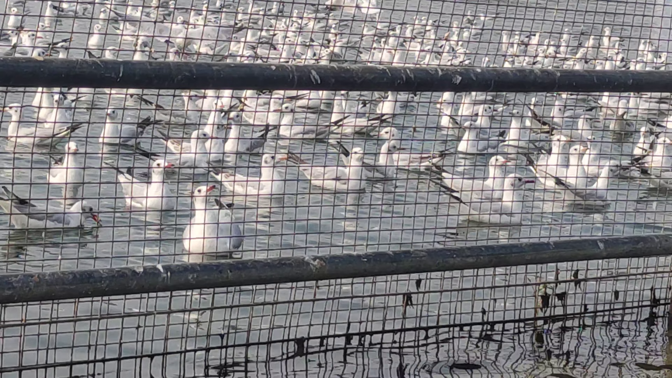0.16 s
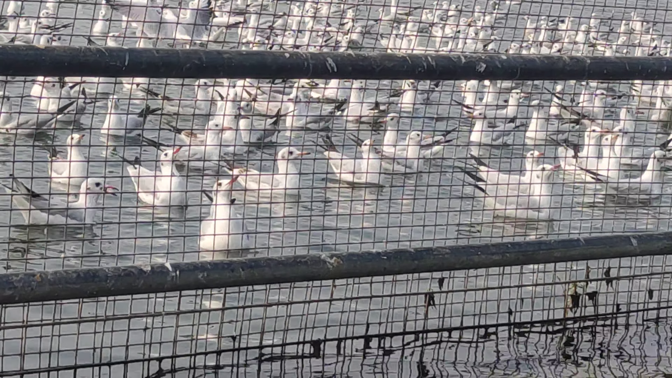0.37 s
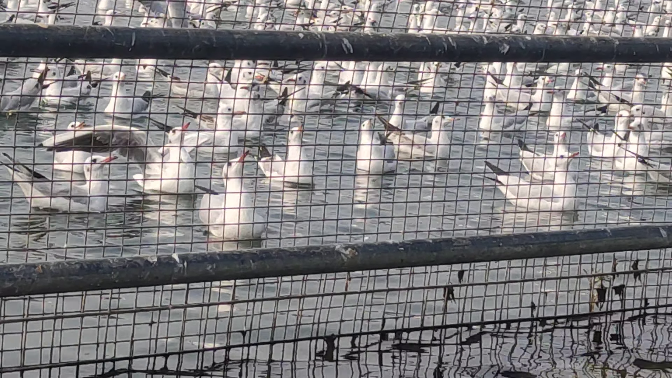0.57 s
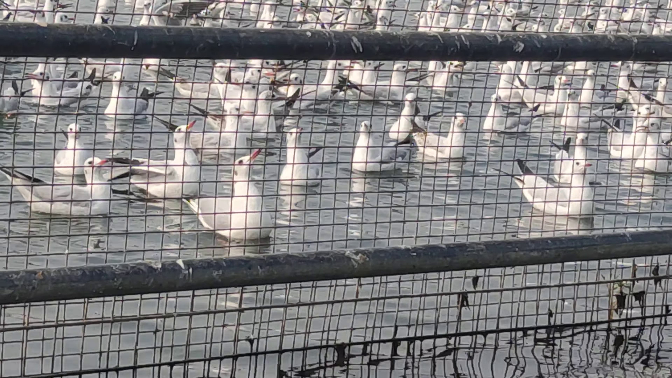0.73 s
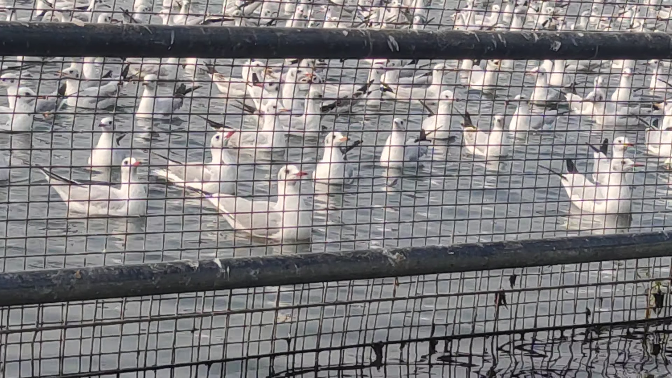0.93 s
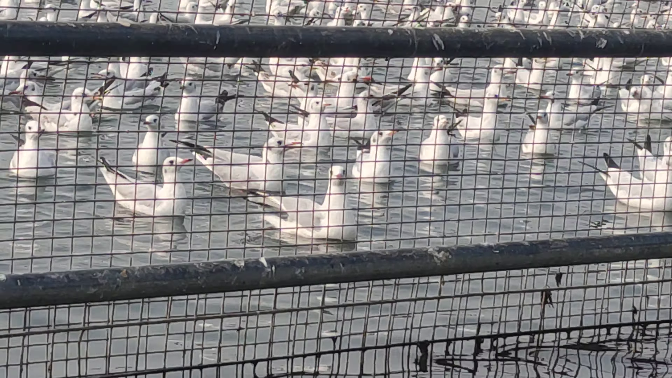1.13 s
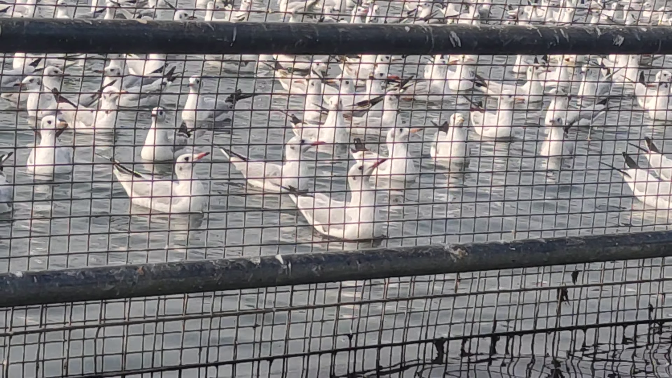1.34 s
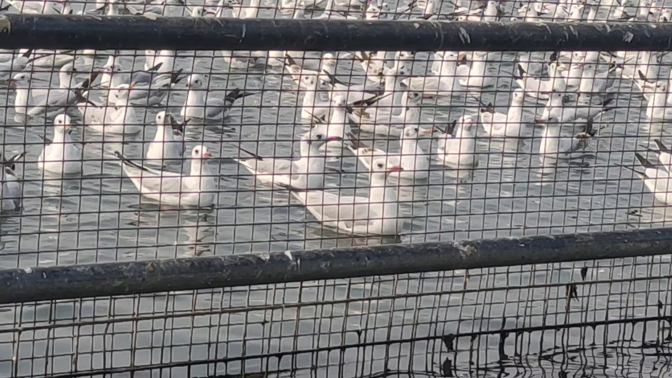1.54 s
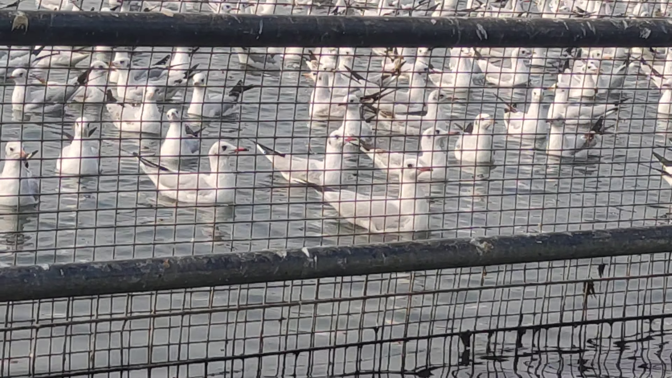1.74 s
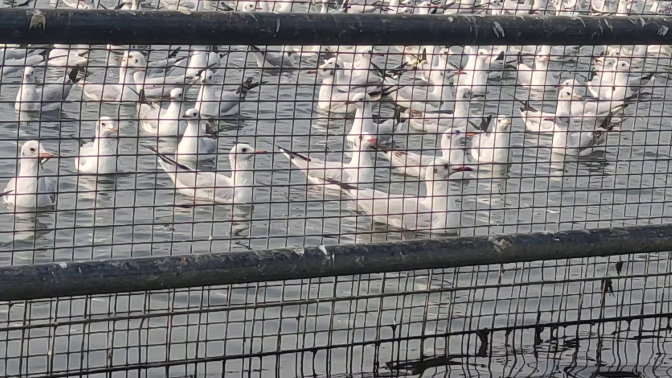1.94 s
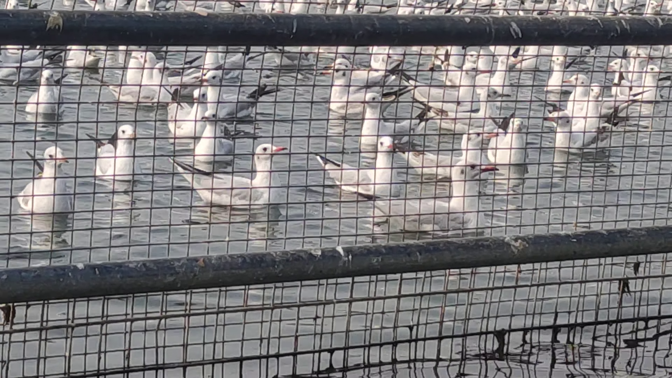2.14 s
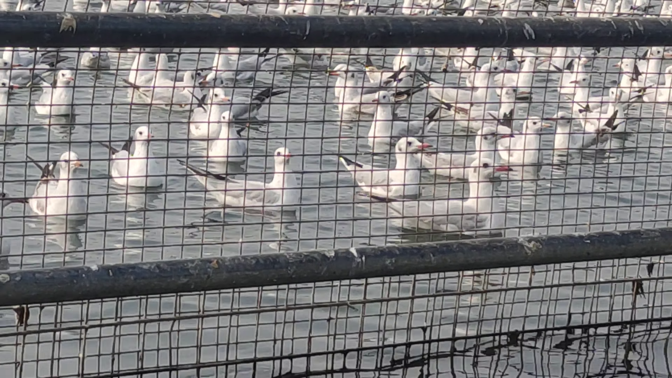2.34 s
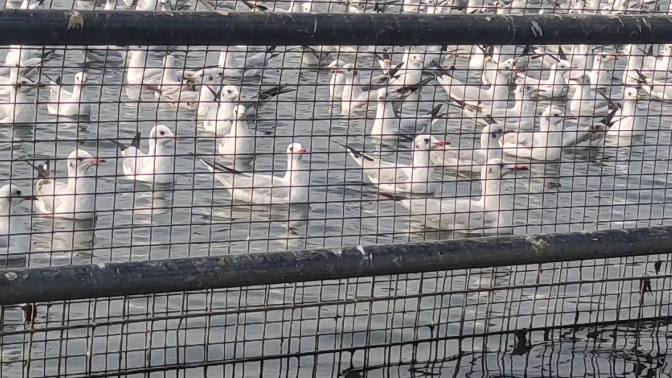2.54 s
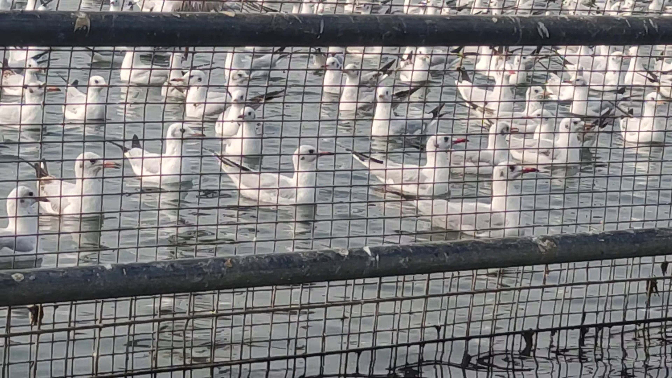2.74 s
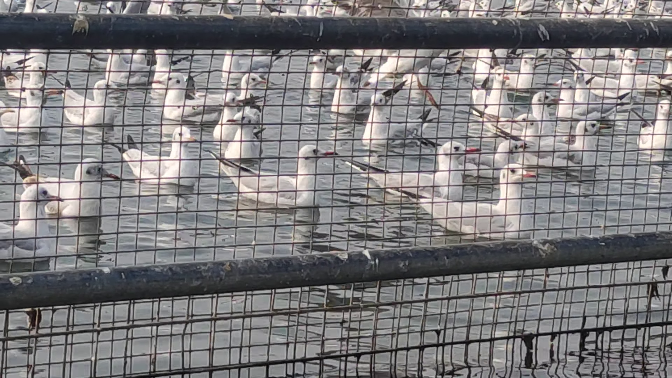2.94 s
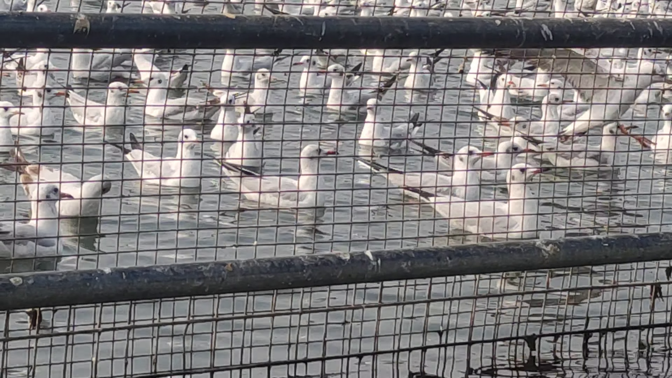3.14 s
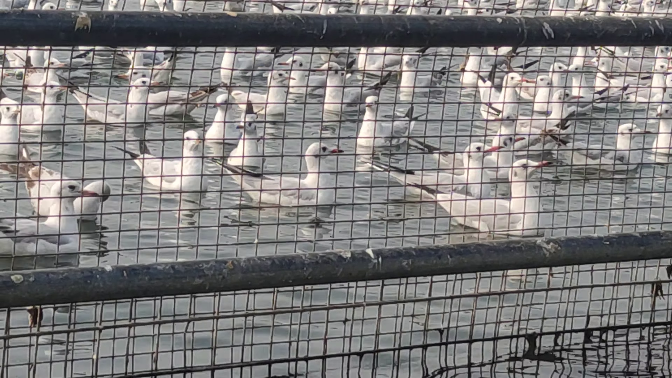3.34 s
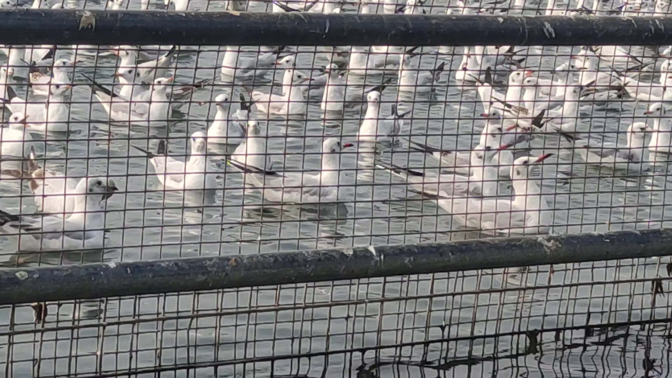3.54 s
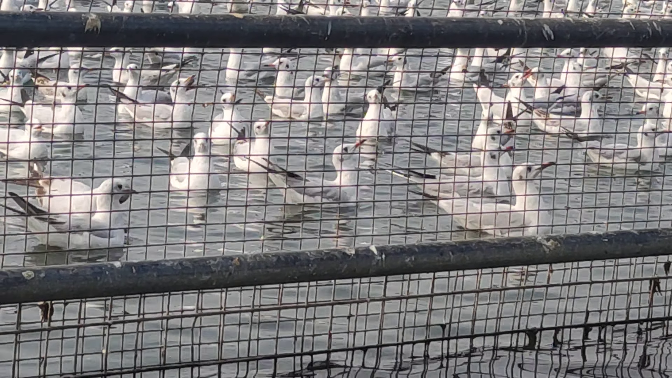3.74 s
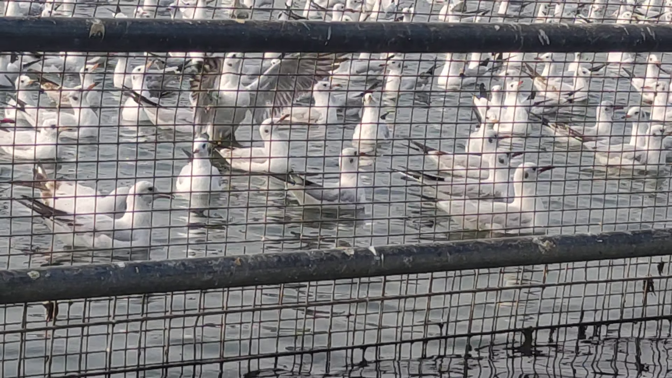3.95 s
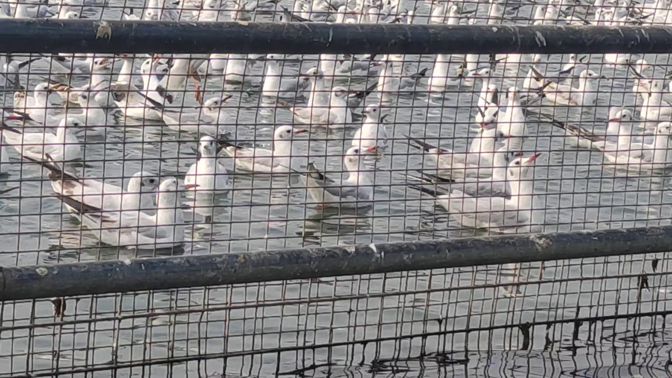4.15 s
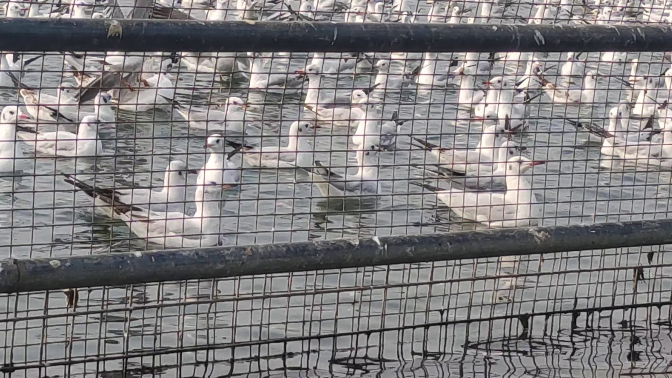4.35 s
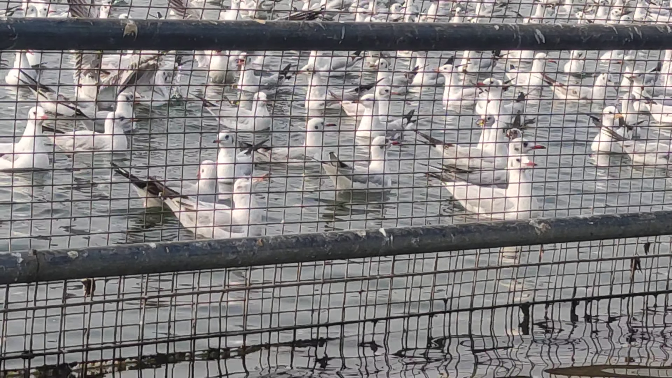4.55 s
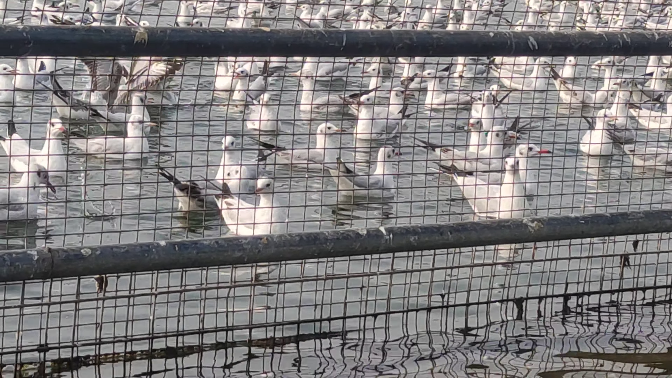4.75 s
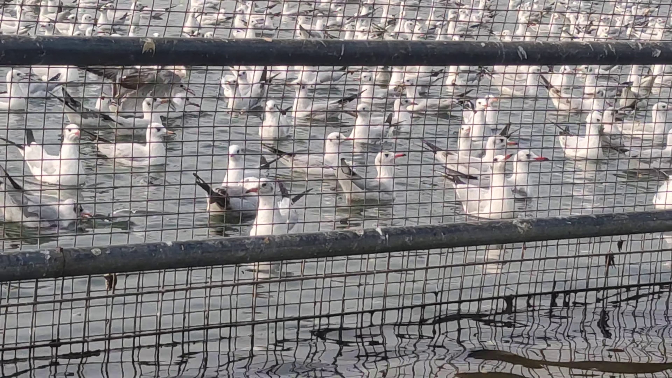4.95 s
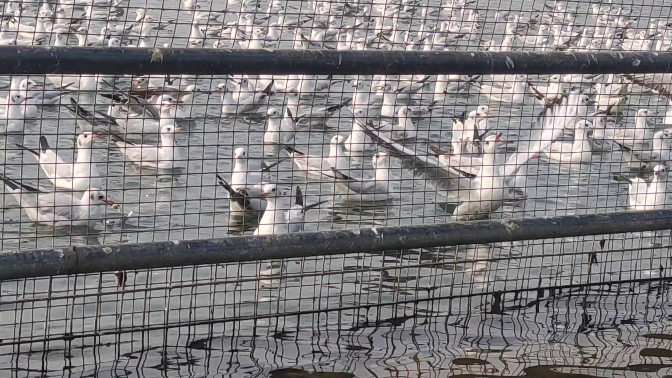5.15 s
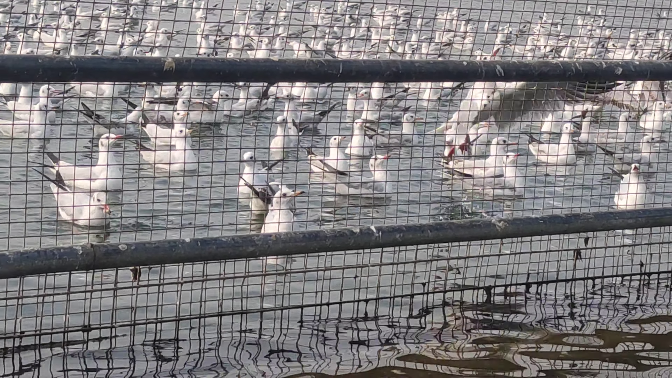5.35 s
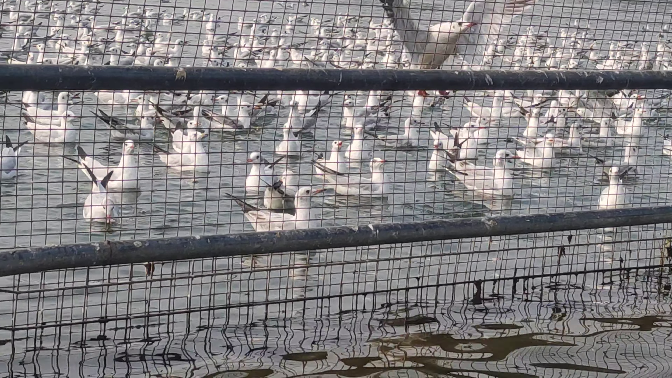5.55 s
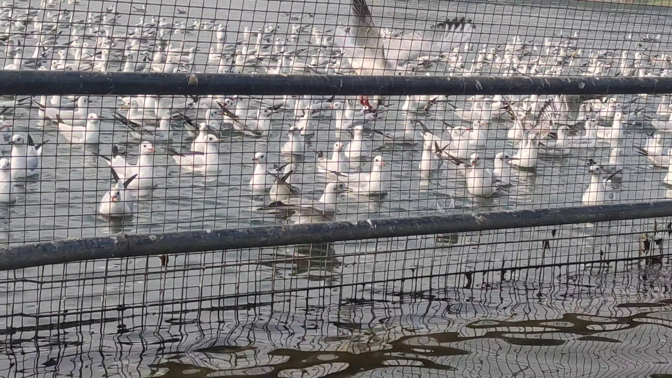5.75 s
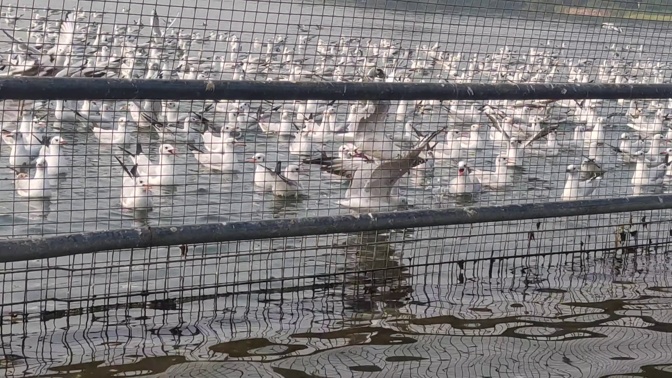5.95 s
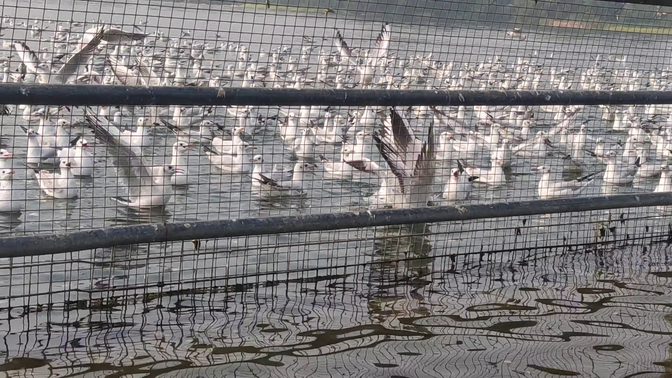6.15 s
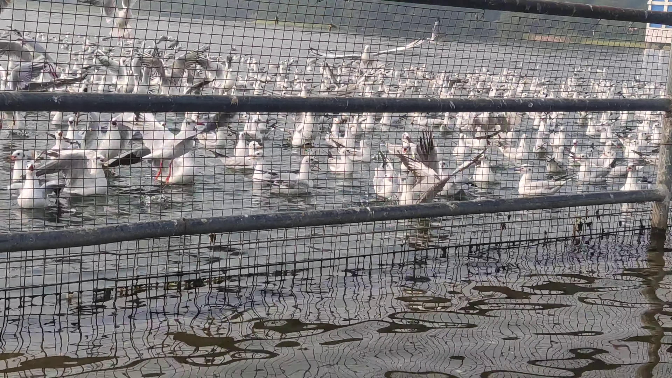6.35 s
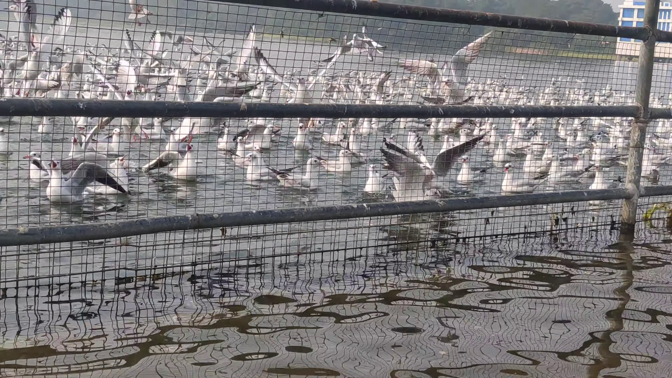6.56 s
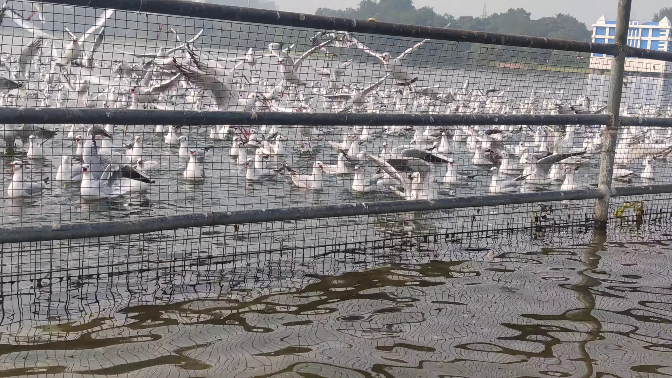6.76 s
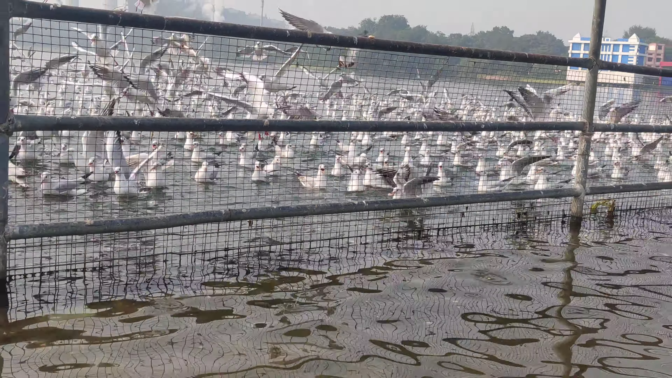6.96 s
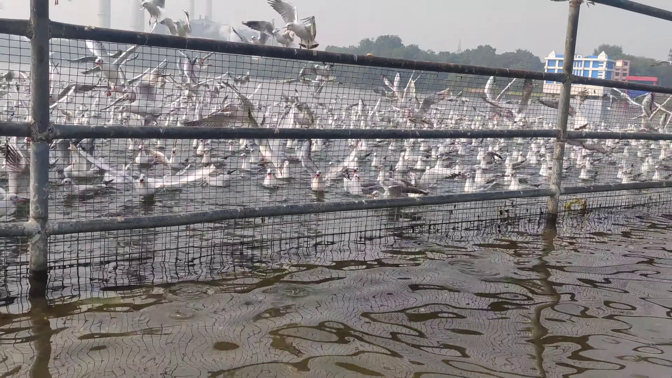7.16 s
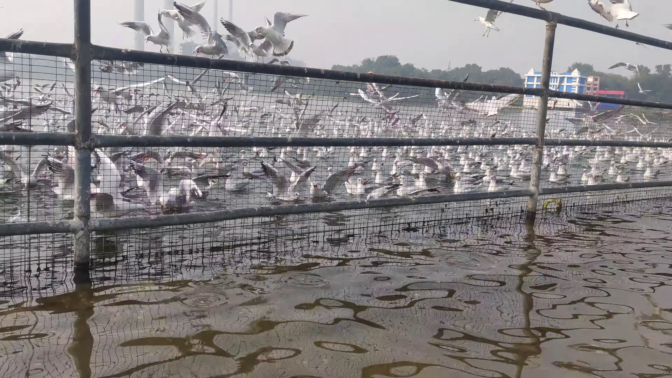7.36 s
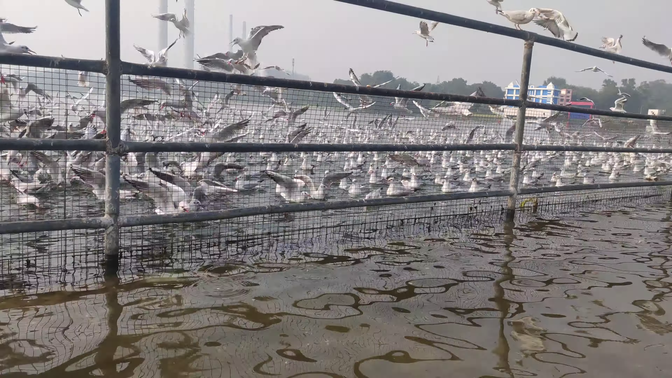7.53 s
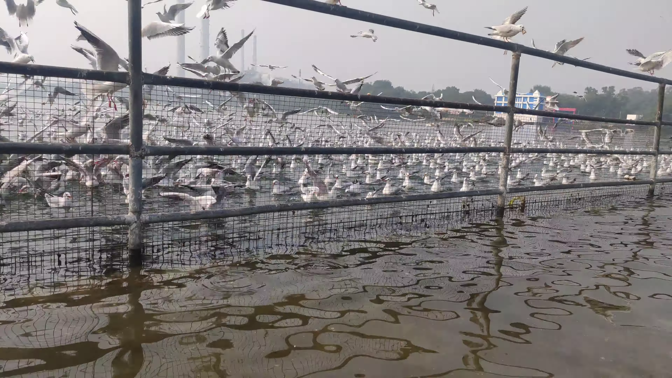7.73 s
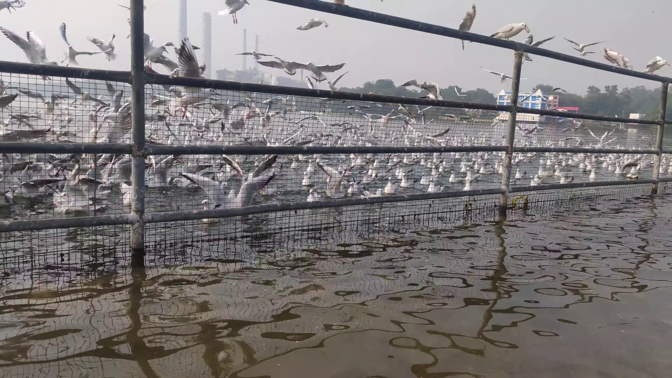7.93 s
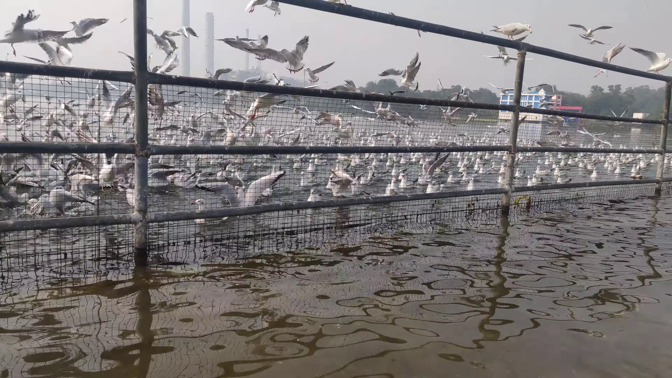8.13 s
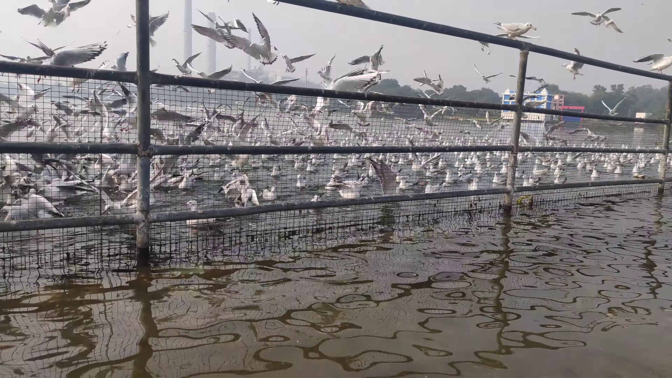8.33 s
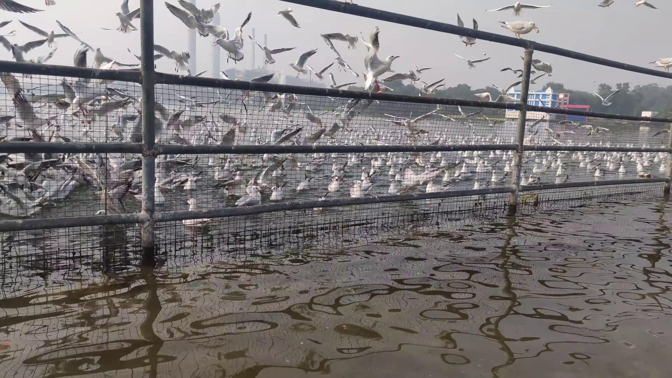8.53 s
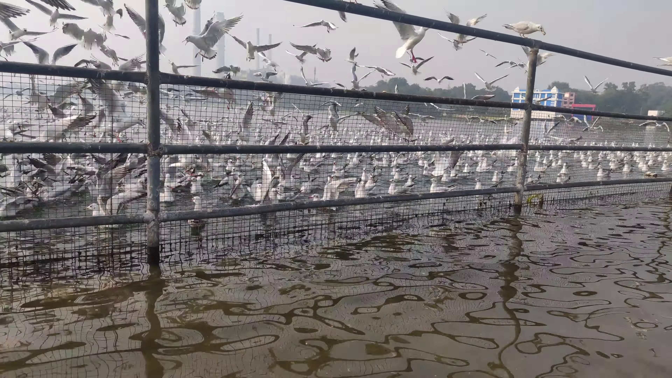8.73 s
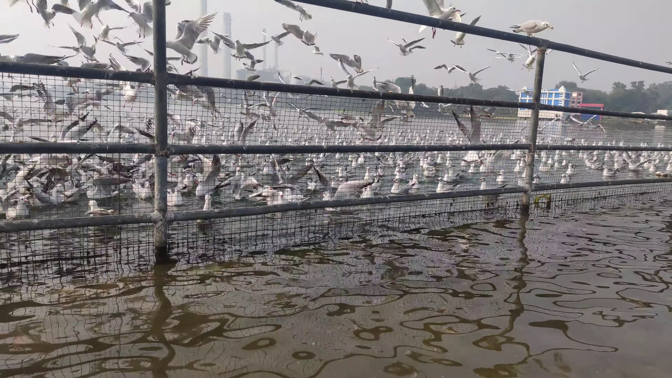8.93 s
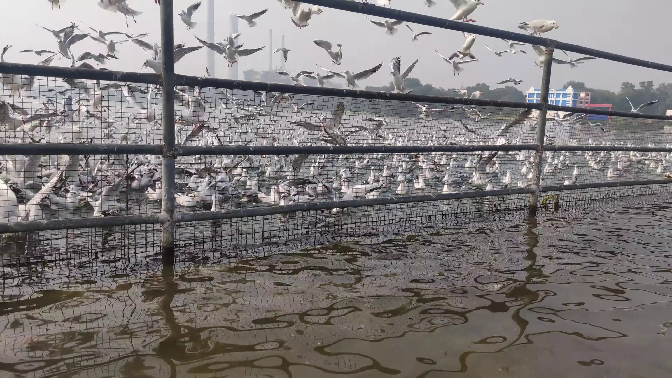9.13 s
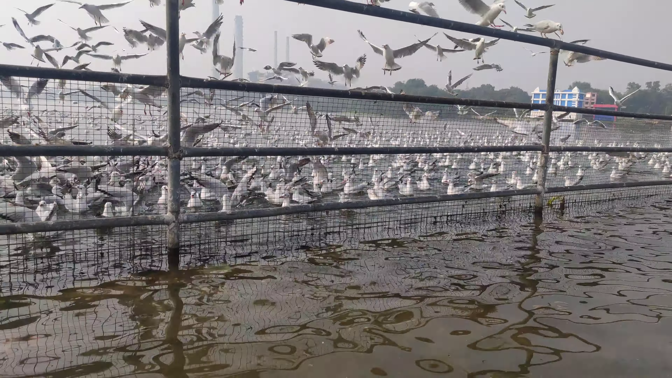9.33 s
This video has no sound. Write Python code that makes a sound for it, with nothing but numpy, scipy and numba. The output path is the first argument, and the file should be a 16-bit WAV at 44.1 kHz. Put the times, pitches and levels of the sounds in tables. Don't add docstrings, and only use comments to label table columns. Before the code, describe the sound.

Hundreds of gulls chatter raspily over a faint town hum, a few clear whistles poking out, before they rise in a dense shrieking wall with wing wash.

```python
import sys
import numpy as np
from scipy import signal
from scipy.fft import rfft, irfft, next_fast_len
from scipy.io import wavfile
from scipy.ndimage import uniform_filter1d
from numba import njit

SR = 44100
rng = np.random.default_rng(int(sys.argv[2]) if len(sys.argv) > 2 else 0)


def amplitude_ratio(level_db):
    exponent = np.asarray(level_db, float) / 20
    return 10 ** exponent


def pcm_store(signal):
    levels = np.round(np.clip(np.atleast_2d(signal), -1, 1) * 32767)
    wavfile.write(sys.argv[1], SR, levels.astype(np.int16).T)


N = 418509
T = np.arange(N) / SR
RATTLE_HZ = 95.9


def level(x, db):
    return x * amplitude_ratio(db) / np.sqrt(np.mean(x ** 2))


def colour(x, points, flatten_bins=0):
    hz, db = np.transpose(points)
    n = next_fast_len(N)
    spec = rfft(x, n)
    f = np.arange(n // 2 + 1) * SR / n + 1
    if flatten_bins:
        spec = spec / np.sqrt(uniform_filter1d(np.abs(spec) ** 2, flatten_bins) + 1e-9)
    gain_db = np.interp(np.log(f), np.log(hz), db, -120, -120)
    return irfft(spec * amplitude_ratio(gain_db), n)[:N]


def walk(rate_hz):
    k = int(SR / rate_hz)
    held = np.repeat(rng.standard_normal(N // k + 1), k)
    return 1.3 * uniform_filter1d(uniform_filter1d(held, k), k)[:N]


def risen_share():
    return np.clip((T - 6) / (6.9 - 6), 0, 1)


@njit
def cries(start, length, hz, arch, rough, gains, jitter, rasp, rattle_hz, depth, sweep):
    n = len(jitter)
    out = np.zeros(n)
    for c in range(len(start)):
        phase = 0.
        for i in range(length[c]):
            if 0 <= start[c] + i < n:
                u = i / length[c]
                j = (start[c] + i + 7919 * c) % n
                burst = 2 * np.pi * rattle_hz[c] * i / SR
                shake = rough[c] * jitter[j] - sweep * depth[c] * np.sin(burst)
                pitch_hz = hz[c] * (1 - arch[c] * (2 * u - .8) ** 2 + shake)
                phase += 2 * np.pi * pitch_hz / SR
                now = np.cos(phase)
                base, before, total = 2 * now, 1., 0.
                for g in gains[c]:
                    total += g * now
                    before, now = now, base * now - before
                size = (1 + 12 * rough[c] * rasp[j]) * (1 - depth[c] * np.cos(burst))
                out[start[c] + i] += total * min(1., 14 * u, 3 * (1 - u)) * size
    return out


def chorus(t0_s, t1_s, count, pitch_hz, spread, rough, size_db, voice_db, rattle):
    u = rng.random((count, 4))
    g = rng.standard_normal((count, 9))
    start_s = t0_s + (t1_s - t0_s) * (np.arange(count) + u[:, 0]) / count
    length_s = .06 + .16 * u[:, 1]
    bird_hz = pitch_hz * np.exp(spread * g[:, 1])
    hoarse = rough * amplitude_ratio(20 * u[:, 2] ** 0.696 - 16)
    gains = amplitude_ratio(size_db * g[:, :1] + voice_db * g[:, 2:])
    gains *= np.sign(rng.standard_normal((count, 7)))
    gains *= amplitude_ratio(3.8 * u[:, 2:3])
    bird_rattle_hz = RATTLE_HZ * (1.2 - 0.3596 * u[:, 1])
    depth = np.clip(rattle * u[:, 2], 0, 1)
    return cries((start_s * SR).astype(np.int64), (length_s * SR).astype(np.int64), bird_hz, .14 * u[:, 3],
                 hoarse, gains, walk(700), walk(400), bird_rattle_hz, depth, 0.029)


# time in seconds, level in dB, brightness in dB per step from throat to beak to rasp.
CROWD_LEVELS = [(0, -32.5, -5.5), (.55, -32.5, -9.5), (1.1, -35, -7.5), (1.5, -37, -9.5), (2.4, -32, -6.5),
                (3.5, -35, -6.5), (4.3, -33.5, -10.5), (4.75, -35, -7), (5.3, -36, -7.5), (5.98, -32, -6.5),
                (6.3, -23, -6), (6.9, -14.5, -3.5), (7.3, -16.5, -1.5), (7.8, -15.5, -2.5), (8.5, -16, -2),
                (9.1, -15.5, -3), (9.28, -18, -3), (9.49, -16.5, -3.5)]
# start in seconds, length in seconds, level in dB, brightness in dB per step.
NEAR_OUTBURSTS = [(-.05, 0.34, -35, -2), (0.375, .38, -27.5, -14.5), (0.753, 0.29, -29, -7.5),
                  (1.183, .25, -32, -6), (1.435, 0.22, -28, -10), (1.721, 0.22, -35, -6),
                  (1.923, .2, -32, -5.5), (2.123, 0.22, -29, -8.5), (2.506, .32, -30.5, -5.5),
                  (2.924, .3, -35, -4), (3.244, 0.14, -28.5, -16), (3.43, 0.11, -34, -6),
                  (3.598, 0.13, -36.5, -2.5), (3.8, 0.2, -39, -5.5), (4.005, 0.28, -32, -8),
                  (4.28, 0.22, -32, -5.5), (4.465, 0.14, -31, -10.5), (4.814, 0.37, -34, -7),
                  (5.32, 0.037, -36.5, -6), (5.423, 0.16, -40, -3.5), (5.625, .2, -34, -9),
                  (5.893, 0.11, -30, -11), (6.018, 0.19, -32.5, -2.5), (6.227, 0.14, -24.5, -4.5),
                  (6.411, 0.22, -23.5, -2), (7.027, 0.26, -18, -1), (7.317, 0.39, -18.5, -3.5),
                  (7.892, .3, -24.5, -3), (9.127, 0.099, -25, -9), (9.282, 0.13, -22.5, -4)]


def loudness(step):
    s, db, bright_db = np.transpose(CROWD_LEVELS)
    throat = (step == 0) * (1 - risen_share())
    power = amplitude_ratio(np.interp(T, s, db + step * bright_db) + 2 * throat) ** 2
    attack_s, release_s = 0.017, 0.061
    for s, length_s, db, bright_db in NEAR_OUTBURSTS:
        rise = (T - s) / attack_s + 0.37
        fall = (s + length_s - T) / release_s + .5
        hold = np.clip(np.minimum(rise, fall), 0, 1)
        power += (hold * amplitude_ratio(db + step * bright_db - 2 * throat)) ** 2
    return np.sqrt(power)


# frequency in Hz, density in dB per Hz.
SITTING_COLOUR = [(650, -28), (1100, -19), (1330, -19), (1980, -6), (2460, -3), (3490, -11), (5070, -15.5),
                  (5370, -19.5), (6830, -19.5), (7360, -19), (8000, -21), (10400, -67), (17600, -120)]
# frequency in Hz, density in dB per Hz.
RISING_COLOUR = [(650, -51), (1100, -25.5), (1350, -25), (1470, -20), (1690, -11.5), (2210, -1),
                 (2950, -7.5), (3370, -5), (5030, -9.5), (5640, -12.5), (7000, -11.5), (7550, -10.5),
                 (8000, -13.5), (10400, -54.5), (17600, -120)]


def flock():
    sitting = chorus(-.2, 7.1, count=760, pitch_hz=1198.7, spread=.14, rough=0.03606,
                     size_db=0.6, voice_db=3.0, rattle=0.7)
    rising = chorus(5.8, 9.5, count=1100, pitch_hz=1121, spread=.09, rough=.04,
                    size_db=2.0, voice_db=2.0, rattle=.55)
    sitting = level(colour(sitting, SITTING_COLOUR, flatten_bins=3000), 0)
    rising = level(colour(rising, RISING_COLOUR, flatten_bins=3000), -1.5)
    up = risen_share()
    both = np.sqrt(1 - up) * sitting + np.sqrt(up) * rising
    below_beak = signal.sosfiltfilt(signal.butter(2, 3100, fs=SR, output="sos"), both)
    below_rasp = signal.sosfiltfilt(signal.butter(2, 5200, fs=SR, output="sos"), both)
    bands = (below_beak, below_rasp - below_beak, both - below_rasp)
    out = np.zeros(N)
    for step, (band, trim_db) in enumerate(zip(bands, (0, -0.5, 0))):
        crowd = np.sqrt(uniform_filter1d(band ** 2, size=4400) + 1e-9)
        out += band / crowd * loudness(step) * amplitude_ratio(trim_db)
    return out


# start in seconds, level in dB, second overtone in Hz, brightness in dB per overtone.
NEAR_SQUAWKS = [(.3755, -18.5, 1880, -10), (.696, -13, 2140, -9), (.762, -15, 2140, -9),
                (.878, -24, 2460, -1), (1.364, -19, 2014, -6.5), (1.984, -16, 2815, -2.5),
                (2.022, -9, 2050, -11), (2.176, -16, 1950, -4), (2.281, -22, 2213, -1.5),
                (2.393, -13, 1960, -13), (2.504, -18, 1960, -3), (2.572, -15, 2370, -4),
                (3.287, -25.5, 2380, -1), (3.3375, -28, 2440, -1), (3.594, -16, 2430, -9),
                (3.6626, -16.5, 2510, -6), (4.085, -20.5, 2780, -5.5), (4.59, -25.5, 2260, -1.5),
                (5.343, -18.5, 2690, -5), (6.037, -14.5, 2690, -2.5), (6.087, -5.5, 2405, -3.5),
                (6.223, -6.5, 2210, -6), (6.4094, -7, 2360, -2.5), (6.7383, -5.5, 2090, -0.5),
                (7.0366, 1, 2230, -8), (7.378, 0, 2306, -5.5)]


def squawks(length_s=.046, rough=.06, trim_db=-15):
    s, db, hz, slope_db = np.transpose(NEAR_SQUAWKS)
    gains = amplitude_ratio(db[:, None] + trim_db + slope_db[:, None] * np.arange(-1, 6))
    gains *= np.sign(rng.standard_normal(gains.shape))
    gains[:, 0] *= amplitude_ratio(-24)
    start = (s * SR).astype(np.int64)
    same = np.ones(len(s))
    length = (same * length_s * SR).astype(np.int64)
    return cries(start, length, hz / 2, .05 * same, rough * same, gains, walk(700), walk(250),
                 RATTLE_HZ * same, 0.35 * same, .03)


def add_whistle(out, row, pitch_rule, waver, rattle_hz=RATTLE_HZ, depth=0):
    s, length_s, mid_hz, db = row
    first, last = pitch_rule
    i = np.arange(max(int(s * SR), 0), min(int((s + length_s) * SR), N))
    u = np.linspace(0, 1, len(i))
    burst = 2 * np.pi * rattle_hz * u * length_s
    hz = mid_hz * (first * (1 - u) * (1 - 2 * u) + 4 * u * (1 - u) + last * u * (2 * u - 1))
    hz = hz * (1 + waver[i] - .02 * depth * np.sin(burst))
    swell = np.clip(np.minimum(u, 1 - u) * length_s / 0.0085, 0, 1)
    swell = swell * amplitude_ratio(-4.5 * np.abs(u - .4) / 0.76 + 1.63)
    swell = swell * (1 - depth * np.cos(burst)) / np.sqrt(1 + depth ** 2 / 2)
    out[i] += amplitude_ratio(db + 3) * swell * np.sin(2 * np.pi * np.cumsum(hz) / SR)


# start in seconds, length in seconds, middle in Hz, level in dB.
ARCHED_LINES = [(.196, 0.14, 4330, -40), (.441, 0.16, 2480, -32), (.539, 0.16, 2500, -27),
                (1.07, .28, 5130, -35), (1.075, 0.28, 2553, -33.5), (1.38, 0.16, 5490, -47),
                (1.41, .09, 6590, -49), (1.422, .075, 7680, -56), (1.437, 0.16, 2410, -34),
                (1.69, 0.14, 5450, -49), (2.268, .12, 5780, -47), (2.858, 0.11, 3860, -41),
                (3.4, 0.12, 6480, -50), (3.405, 0.19, 4300, -37.5), (3.803, 0.17, 5630, -46),
                (3.8, 0.15, 2840, -39), (4.235, .13, 5480, -52), (5.215, .05, 4940, -49),
                (5.248, .11, 5640, -48), (5.245, .11, 6780, -59), (5.47, 0.11, 7600, -52),
                (5.46, .07, 6300, -60), (1.7, .07, 2480, -35), (8.386, 0.073, 2220, -20)]
# start in seconds, length in seconds, middle in Hz, level in dB.
SAGGING_LINES = [(.202, 0.073, 1555, -37), (.214, 0.072, 2730, -34), (.21, 0.14, 3260, -39),
                 (.224, 0.092, 6540, -45), (.3, 0.19, 5830, -52), (.644, .085, 5350, -47),
                 (.77, .105, 5540, -55), (1.237, 0.081, 3320, -42), (1.91, .08, 1960, -34),
                 (1.866, .093, 6100, -48), (1.92, 0.094, 2900, -38), (2.045, 0.081, 6450, -45),
                 (2.055, .13, 3200, -35), (2.115, .11, 6000, -47), (2.18, 0.16, 1950, -35),
                 (2.22, 0.14, 2960, -37), (3.05, .14, 5060, -46), (3.05, .15, 2780, -35),
                 (3.35, .083, 1650, -35), (6.156, 0.13, 4000, -37), (7.075, 0.083, 5080, -24),
                 (7.186, 0.11, 2220, -20), (8.566, 0.065, 2200, -16.5)]
# start in seconds, length in seconds, middle in Hz, level in dB.
RISING_LINES = [(0, 0.096, 4000, -37), (0.55, 0.095, 2220, -25), (1, 0.098, 2435, -30),
                (1, .064, 2800, -36), (1.8, .075, 2500, -32.5), (2.88, .05, 6480, -44),
                (3.5, .07, 4330, -42), (4.6, .12, 5900, -55), (3.5, .035, 1830, -33), (4, 0.055, 3400, -36),
                (4.11, 0.055, 2150, -38), (2.885, .055, 5450, -46), (4.889, .075, 7240, -49),
                (6, .06, 7350, -54), (6.5, 0.14, 2800, -31), (6.5, 0.18, 2540, -25), (7, .12, 2340, -22),
                (8.178, 0.083, 2230, -16.5), (8.72, 0.066, 3900, -19.5), (8.21, 0.081, 3250, -19),
                (7, 0.065, 3450, -17.5), (6.86, .06, 3330, -19.5), (9.5, 0.15, 2184, -21)]
# start in seconds, length in seconds, middle in Hz, level in dB.
HELD_LINES = [
    (5.71, 0.11, 5700, -46),
    (5.79, 0.09, 3900, -42),
    (5.4, .08, 7140, -49),
    (4.565, .04, 6100, -49),
    (4.265, .1, 1980, -28),
]
# start in seconds, length in seconds, middle in Hz, level in dB.
BOWED_LINES = [
    (4.765, .23, 5760, -44.5),
    (4.62, .15, 7620, -55),
    (1.829, .09, 2060, -30),
    (1.475, .06, 2200, -35),
]
# start in seconds, length in seconds, middle in Hz, level in dB.
HOARSE_LINES = [(0.147, 0.091, 6300, -38), (1.2, .11, 6800, -50), (2.287, .08, 4700, -38),
                (2.564, 0.11, 4400, -36), (2.676, 0.12, 3960, -34.5), (3.62, 0.12, 3950, -38),
                (4.951, 0.21, 2240, -34), (4.301, .1, 5080, -37), (6.071, 0.081, 4020, -31),
                (6.08, .08, 2250, -26), (6.245, .1, 4250, -30), (6.282, 0.19, 2970, -28),
                (6.799, .2, 3230, -25)]
# start in seconds, length in seconds, middle in Hz, level in dB.
SITTING_LINES = [(0.0, 0.115, 2760, -36), (0.025, 0.075, 5700, -48), (0.394, 0.14, 2090, -33),
                 (0.733, 0.12, 2060, -35), (0.848, 0.085, 6740, -45), (0.853, 0.06, 6400, -46),
                 (0.988, 0.096, 2350, -33), (1.467, 0.16, 3250, -41), (1.985, 0.2, 6000, -47),
                 (2.18, 0.06, 7600, -48), (2.22, 0.15, 6880, -49), (2.225, 0.13, 4500, -43),
                 (2.275, 0.077, 6100, -45), (2.29, 0.115, 6650, -49), (2.479, 0.059, 2850, -37),
                 (2.499, 0.06, 6810, -46), (2.559, 0.07, 2685, -31), (2.564, 0.14, 5280, -42),
                 (2.579, 0.08, 3780, -37), (2.639, 0.125, 6960, -47), (2.639, 0.13, 4960, -40),
                 (2.878, 0.21, 3290, -41), (2.923, 0.15, 5140, -40), (2.953, 0.09, 1740, -39),
                 (3.033, 0.18, 4980, -40.5), (3.312, 0.107, 1745, -34.5), (3.377, 0.05, 2200, -31),
                 (3.422, 0.16, 4330, -45), (3.477, 0.073, 6520, -48), (3.587, 0.14, 3950, -38),
                 (3.657, 0.08, 3870, -35), (3.662, 0.08, 6580, -41), (3.682, 0.08, 4960, -43),
                 (3.806, 0.062, 2500, -35), (3.991, 0.067, 2360, -37), (4.061, 0.17, 2730, -38),
                 (4.18, 0.07, 2760, -30), (4.32, 0.18, 2290, -38), (4.33, 0.12, 2870, -37),
                 (4.36, 0.085, 5950, -47), (4.774, 0.081, 5590, -47), (4.839, 0.075, 2450, -35),
                 (4.914, 0.089, 5580, -42), (5.024, 0.087, 7130, -46), (5.088, 0.13, 2330, -39),
                 (5.642, 0.083, 2390, -33), (5.802, 0.07, 2350, -33), (5.902, 0.065, 3900, -36)]
# start in seconds, length in seconds, middle in Hz, level in dB.
FLYING_LINES = [(6.001, 0.12, 4380, -39), (6.146, 0.065, 6850, -37), (6.211, 0.095, 7290, -39),
                (6.226, 0.07, 4010, -29), (6.261, 0.12, 2470, -27), (6.41, 0.12, 5950, -31),
                (6.415, 0.09, 7120, -41), (6.495, 0.155, 2020, -22.5), (6.525, 0.12, 2805, -22),
                (6.54, 0.165, 6220, -31), (6.58, 0.2, 6230, -34.5), (6.715, 0.075, 4950, -22.5),
                (6.73, 0.11, 5070, -28), (6.735, 0.125, 7530, -33.5), (6.77, 0.065, 6470, -25),
                (6.909, 0.12, 5140, -24), (7.059, 0.07, 5030, -23), (7.139, 0.079, 4970, -23),
                (7.254, 0.065, 6700, -25), (7.313, 0.065, 6200, -28), (7.318, 0.07, 4900, -25),
                (7.418, 0.11, 6760, -28), (7.433, 0.2, 2257, -17.5), (7.797, 0.099, 7470, -31.5),
                (7.837, 0.155, 2242, -17.5), (7.847, 0.08, 6440, -26.5), (7.957, 0.175, 6180, -28.5),
                (7.997, 0.075, 3440, -18), (8.052, 0.125, 7300, -27), (8.151, 0.075, 6830, -26.5),
                (8.201, 0.095, 6010, -28.5), (8.281, 0.165, 6850, -26), (8.286, 0.125, 3414, -20),
                (8.466, 0.085, 5120, -21.5), (8.531, 0.16, 6790, -27.5), (8.595, 0.08, 5600, -28.5),
                (8.705, 0.125, 3740, -22.5), (8.72, 0.063, 2460, -19), (8.765, 0.13, 4050, -23.5),
                (8.775, 0.08, 6310, -25), (8.78, 0.075, 7540, -27), (9.039, 0.15, 2150, -22.5),
                (9.144, 0.22, 2046, -25), (9.179, 0.075, 6680, -33)]
# start in seconds, length in seconds, middle in Hz, level in dB, rattle in Hz.
RATTLED_LINES = [(0.367, .12, 3050, -37, 95), (0.717, 0.19, 3160, -36.5, 88), (.772, .09, 4950, -42, 92),
                 (.862, .14, 4900, -43, 110), (.885, 0.21, 6960, -48, 110), (1.96, .08, 7240, -47, 101),
                 (2.286, .1, 7140, -38, 99), (2.602, .1, 5200, -37, 80), (3.06, .12, 3000, -44, 112),
                 (3.622, 0.12, 6700, -44, 75), (3.898, .09, 4350, -46, 90), (5.065, .085, 4850, -43, 103),
                 (5.072, 0.064, 5960, -48, 103), (5.054, .12, 7250, -45, 103), (4.132, .1, 3310, -37, 95),
                 (4.47, .09, 3200, -37, 95), (6.09, .1, 4220, -38, 99), (.07, 0.11, 6100, -37.5, 97)]
# start in seconds, length in seconds, middle in Hz, level in dB, share of pitch lost.
FALLING_LINES = [(.545, 0.061, 2080, -28, 0.17), (0.72, .085, 1830, -36, 0.17),
                 (1.345, 0.046, 1920, -27.5, 0.17), (3.341, 0.045, 1790, -31, 0.19),
                 (3.505, 0.074, 1905, -33, 0.14), (3.505, 0.066, 6260, -43, .1),
                 (3.525, .06, 5160, -44, .07), (3.7, .065, 6100, -52, .05), (3.71, .06, 7280, -60, .07),
                 (3.916, 0.054, 2250, -29, 0.48), (4.425, .077, 4410, -50, .11),
                 (2.984, 0.31, 2500, -31, .07), (3.629, 0.098, 3930, -38, 0.052),
                 (5.22, .05, 5900, -56, .05), (7.497, .035, 4880, -34, .06)]


def whistles():
    out = np.zeros(N)
    clear = .004 * walk(260)
    hoarse = .03 * walk(900)
    thick = .3 * hoarse
    flat = (1.005, 1)
    clear_kinds = ((ARCHED_LINES, (0.97, 0.94)), (SAGGING_LINES, (1.015, 0.98)), (RISING_LINES, (0.95, 1.015)),
                   (HELD_LINES, flat), (BOWED_LINES, (.935, .94)))
    for table, pitch_rule in clear_kinds:
        for row in table:
            add_whistle(out, row, pitch_rule, clear)
    for table, waver in ((HOARSE_LINES, hoarse), (SITTING_LINES, thick), (FLYING_LINES, thick)):
        for row in table:
            add_whistle(out, row, flat, waver, depth=0.45)
    for *row, rattle_hz in RATTLED_LINES:
        add_whistle(out, row, flat, thick, rattle_hz, depth=.95)
    for *row, lost in FALLING_LINES:
        add_whistle(out, row, (1 + .45 * lost, 1 - .55 * lost), clear)
    flutter = amplitude_ratio(1.9 * walk(45))
    return out * flutter * (1 + 0.12 * walk(320))


# time in seconds, level in dB.
WASH_LEVELS = [
    (5.8, -40),
    (6.18, -46),
    (6.2, -35.5),
    (7.12, -29),
    (7.79, -31),
    (9.47, -31),
    (9.49, -25),
]
# frequency in Hz, density in dB per Hz.
WASH_SPECTRUM = [(120, -46.5), (200, -9.5), (337, -10.5), (431, -4.5), (651, -6.5), (1340, -8), (1500, -1),
                 (1950, -28), (3300, -120)]
# start in seconds, level in dB, pitch in Hz.
LOW_FLAPS = [
    (7.695, -33.5, 160),
    (7.742, -27, 163.7),
    (7.991, -31.5, 150.3),
    (8.014, -28, 145.6),
    (8.669, -31, 158),
    (8.77, -35, 135),
]


def wings():
    s, db = np.transpose(WASH_LEVELS)
    wash = level(colour(rng.standard_normal(N), WASH_SPECTRUM), 1.5)
    out = wash * amplitude_ratio(np.interp(T, s, db, -90) + 0.7 * walk(6))
    for s, db, hz in LOW_FLAPS:
        t = np.clip(T - s, 0, None) / 0.015
        out += amplitude_ratio(db + 11.5) * t * np.exp(-t) * np.sin(2 * np.pi * hz * (T - s))
    return out


# frequency in Hz, density in dB per Hz.
TOWN_SPECTRUM = [(8.8, -29.5), (15, 5.5), (53, -1), (124, -5.5), (169, -4), (240, -7), (265, -12.5),
                 (298, -3), (335, -14.5), (432, -11), (602, -6.5), (651, -13.5), (704, -8), (1100, -13),
                 (1600, -6), (2080, -15), (3520, -120)]
# frequency in Hz, width in Hz, level in dB.
MACHINE_HUMS = [
    (161, 38, -54.5),
    (304.5, 27, -50.5),
    (439, 25, -44.5),
    (705, 72, -43),
]


def town():
    out = level(colour(rng.standard_normal(N), TOWN_SPECTRUM), -32) * amplitude_ratio(.5 * walk(1.5))
    for hz, width_hz, db in MACHINE_HUMS:
        resonance = signal.iirpeak(hz, hz / width_hz, fs=SR)
        out += level(signal.lfilter(*resonance, rng.standard_normal(N)), db)
    return out


def scene():
    return np.tile(flock() + squawks() + whistles() + wings() + town(), (2, 1))


def low_pass(x):
    return signal.sosfilt(signal.butter(12, 8580, fs=SR, output="sos"), x)


def record(dry):
    rounded = 1.346 * np.tanh(dry / 1.572)
    top_cut = signal.cheby2(10, 62, 7663 * 1.206, fs=SR, output="sos")
    x = signal.sosfilt(top_cut, rounded)
    return low_pass(np.clip(x, -1, 1))


dry = scene()
out = record(dry)
pcm_store(out)
```